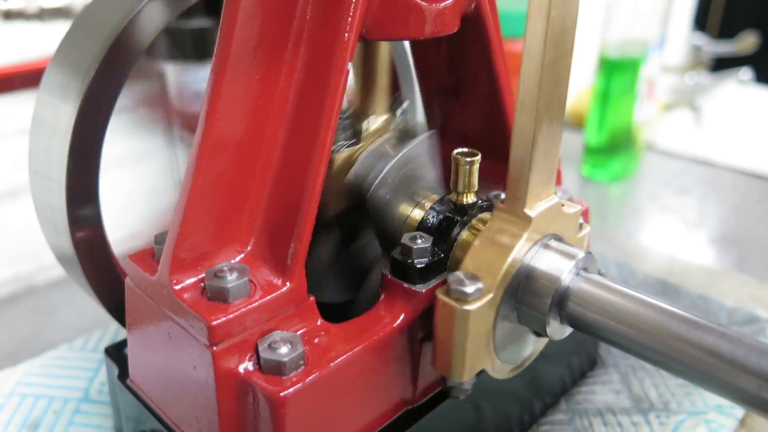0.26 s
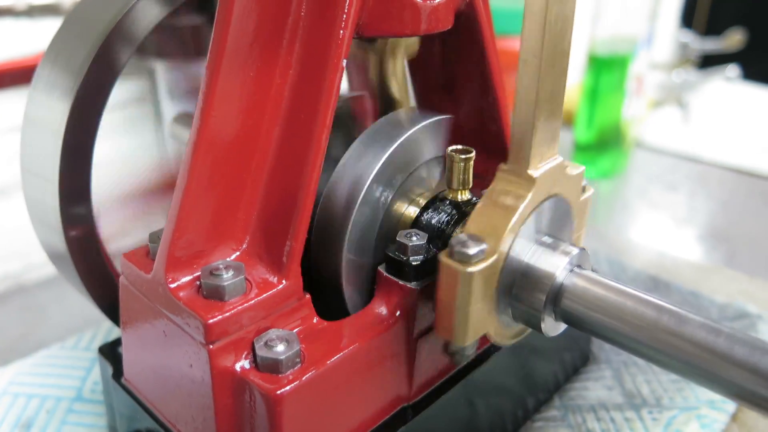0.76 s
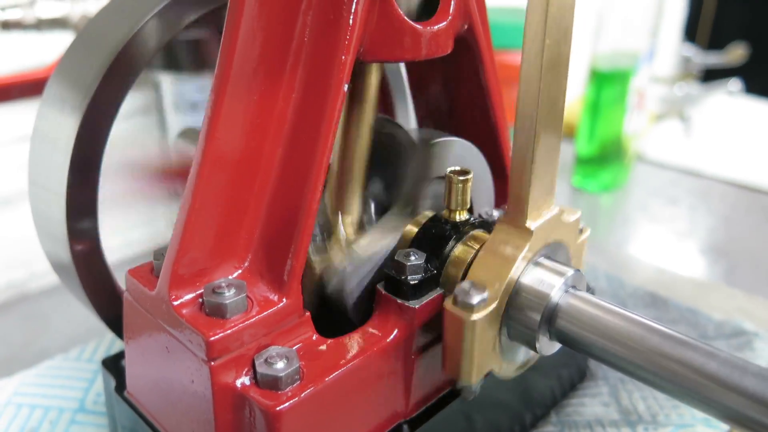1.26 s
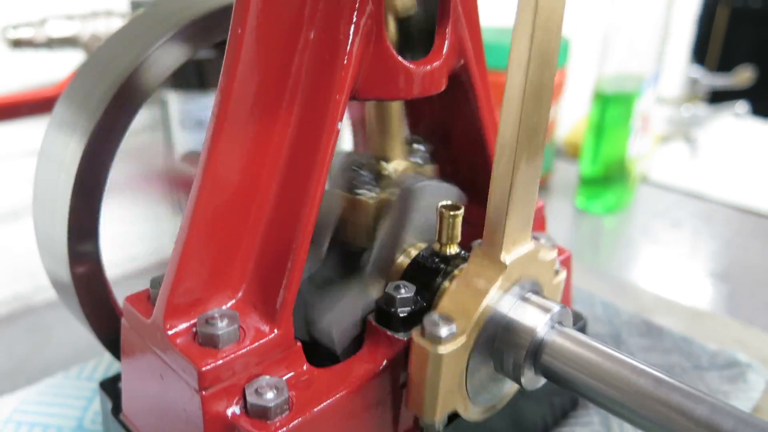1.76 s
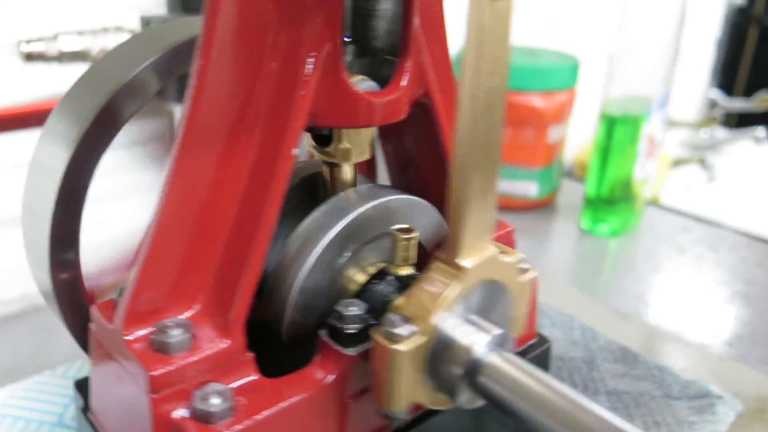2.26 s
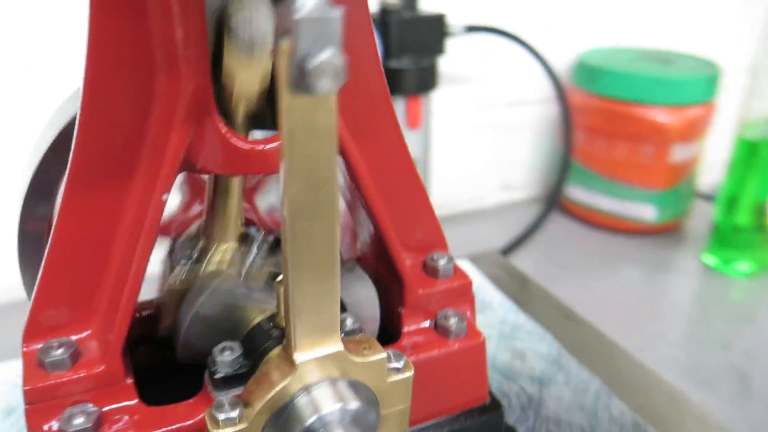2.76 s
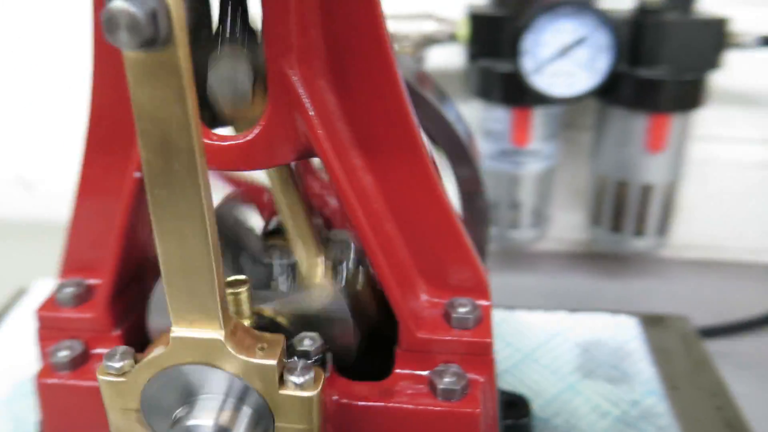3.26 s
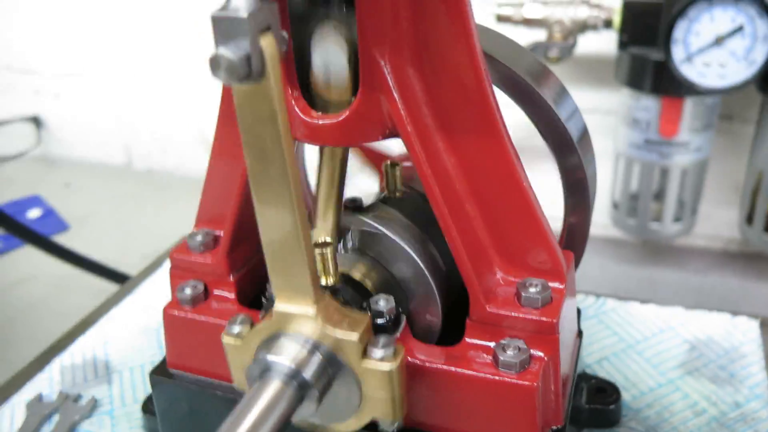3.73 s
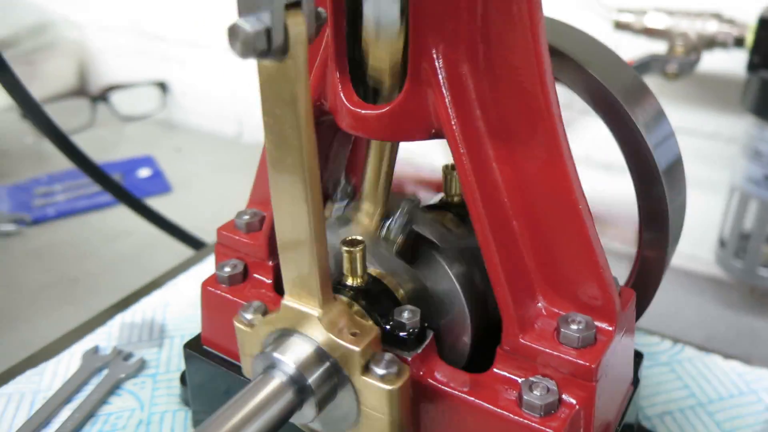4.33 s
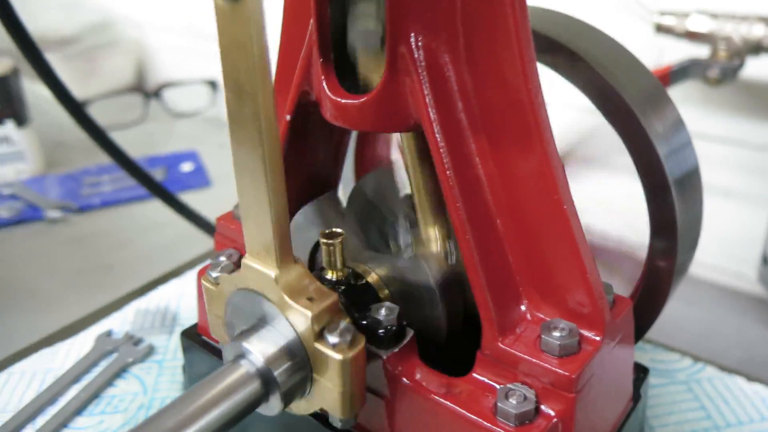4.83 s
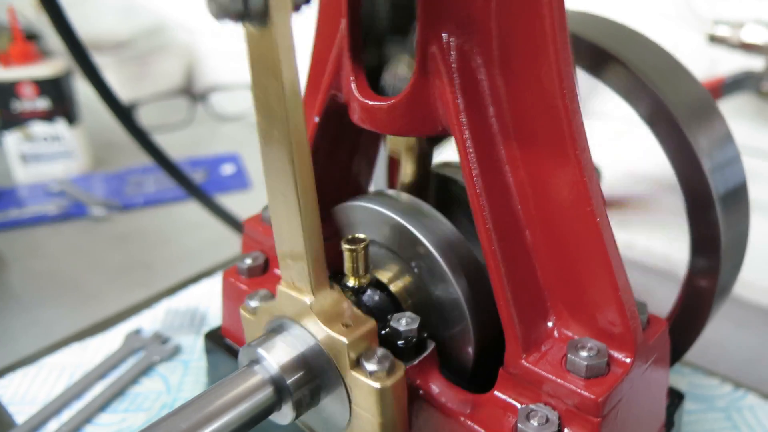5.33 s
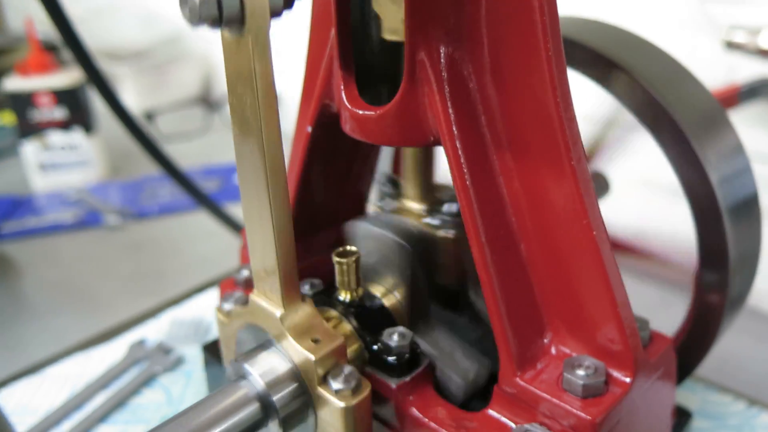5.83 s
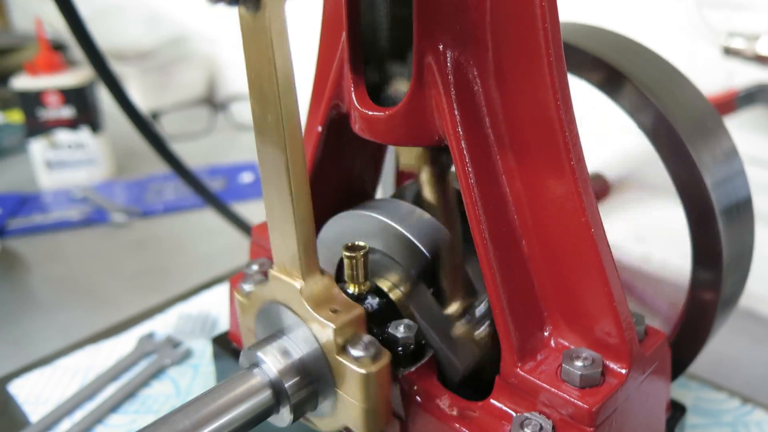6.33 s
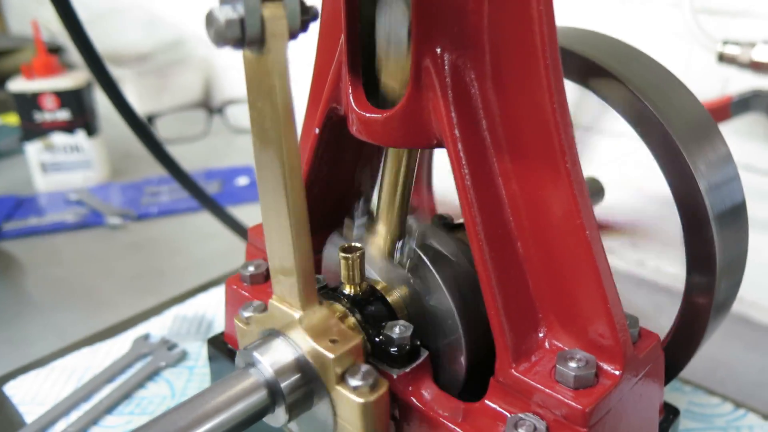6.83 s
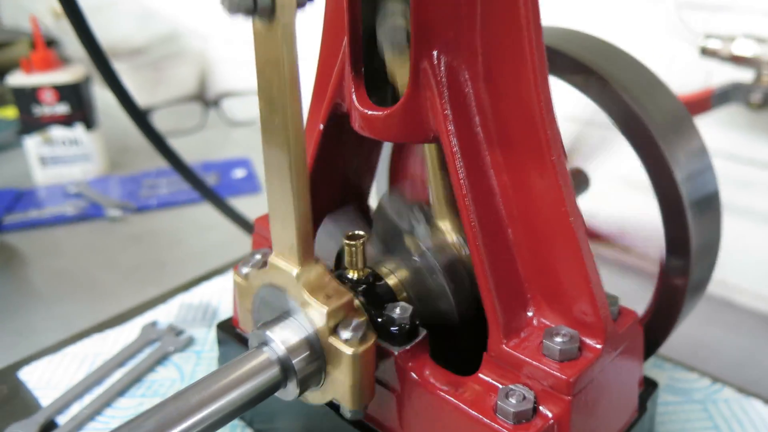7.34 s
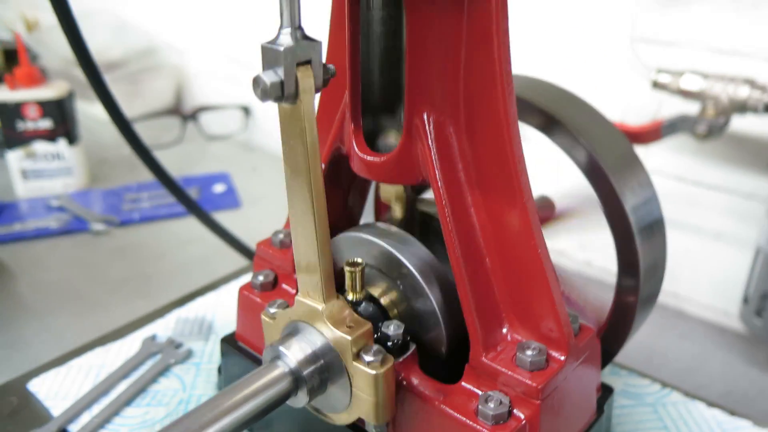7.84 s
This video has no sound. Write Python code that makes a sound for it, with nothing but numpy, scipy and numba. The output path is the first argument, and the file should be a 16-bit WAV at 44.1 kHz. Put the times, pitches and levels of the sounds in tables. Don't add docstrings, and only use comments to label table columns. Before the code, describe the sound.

Close stereo sound of a small model engine driven by compressed air, about three turns a second. Two sharp puffs per turn alternate with breathy, whistling inlet hiss, low soft thumps, bearing knocks and dry valve ticks. The microphones move round it; after three seconds puffs get louder and brighter. Behind, faint hammering on wood, a distant vehicle and low room rumble.

```python
import sys
import numpy as np
from scipy import signal
from scipy.fft import rfft, irfft, next_fast_len
from scipy.io import wavfile
from numba import njit

SR = 44100
rng = np.random.default_rng(int(sys.argv[2]) if len(sys.argv) > 2 else 0)


def invert_db(x):
    u = np.asarray(x, float) / 20
    return 10 ** u


def dump(signal):
    limited = np.clip(np.atleast_2d(signal).T, -1, 1)
    pcm = np.round(limited * 32767).astype(np.int16)
    wavfile.write(sys.argv[1], SR, pcm)


N = 356971

# frequency in Hz, level in dB.
RUMBLE_SPECTRUM = [(13, -43), (22, 7.5), (190, 0), (1090, -19), (2340, -17.5), (3630, -21), (13900, -26),
                   (14800, -36)]
# time in seconds, firing pitch in Hz, level in dB.
VEHICLE_PASSES = [
    [(1.84, 89, -50), (1.9, 90.4, -29), (2.3, 98.5, -46), (2.5, 102.5, -32), (2.9, 108.7, -42.5),
     (3.17, 113.6, -35), (3.45, 120, -46)],
    [(4.4, 58, -46), (4.7, 64, -40), (5.8, 86, -35.5), (6.4, 94, -43), (7, 96, -72), (7.8, 95, -35.5),
     (8.1, 95, -43)],
]
# time in seconds, peak level in dB.
HAMMER_BLOWS = [(0.14, -33.5), (0.469, -30), (0.737, -28), (0.974, -29), (1.319, -28.5), (1.618, -27),
                (1.921, -29), (2.199, -28.5), (2.469, -28), (2.745, -27)]
# frequency in Hz, width in Hz, level in dB.
PLANK_MODES = [(165, 52, 3.5), (360, 180, -7.5), (567.4, 14.4, 1.5), (734, 38, -2.9), (913, 18, -4),
               (965, 180, -19), (1330, 120, -16.5)]
# frequency in Hz, width in Hz, level in dB.
LEAK_MODES = [(4480, 400, -10), (6100, 200, -11), (9890, 140, 0.1), (10750, 130, -4), (11200, 130, -3),
              (12700, 600, -10), (13900, 170, 0.1)]
# frequency in Hz, width in Hz, level in dB.
FRAME_MODES = [(246, 370, -15), (398, 103, -1), (533, 33.7, 3.2), (635, 52, -6)]
# frequency in Hz, width in Hz, level in dB.
CHEST_MODES = [(2764, 78, 10.5), (2594, 67, 10)]
# frequency in Hz, width in Hz, level in dB.
PASSAGE_MODES = [(5016, 52, 7), (6880, 53, 5), (7800, 82, -21.5)]
# frequency in Hz, width in Hz, level in dB.
EDGE_MODES = [(9170, 110, 4.5), (9800, 190, -2), (11100, 180, -5), (11900, 59, 1), (11900, 220, -31),
              (13600, 400, -19)]
# mid-fill frequency in Hz, slide in Hz per second, width in Hz, level in dB.
RISING_CYLINDER_NOTES = [(4350, -3000, 130, -6), (5800, 9000, 110, -10)]
# mid-fill frequency in Hz, slide in Hz per second, width in Hz, level in dB.
FALLING_CYLINDER_NOTES = [(4300, -800, 120, -8), (5500, 7000, 100, -10)]
# frequency in Hz, width in Hz, level in dB.
JET_MODES = [(8980, 210, -3.5), (11270, 520, 2.5), (12800, 640, -0.5), (14500, 3900, -9.5)]
# frequency in Hz, width in Hz, level in dB.
PUFF_BODY_MODES = [(1180, 120, -9), (2640, 250, 3), (3430, 1100, -26), (4520, 380, -1), (5040, 270, -0.5),
                   (6980, 360, 2)]
# rising-stroke exhaust in seconds, its puff level in dB,
# big-end knock level in dB, valve tick level in dB.
ENGINE_TURNS = [(0.046, -21.5, -43, -16), (0.3563, -22.5, -39, -43.7), (0.6676, -26, -38, -39.6),
                (0.9757, -22.5, -39, -40), (1.2858, -22.5, -42, -38.4), (1.5983, -20.5, -39, -17.5),
                (1.9076, -23, -40, -43.5), (2.217, -21, -53, -23), (2.5261, -18.5, -46, -39.5),
                (2.837, -19.5, -36, -31), (3.146, -14, -37, -20), (3.4584, -14, -32, -18),
                (3.769, -12, -38, -35.7), (4.0805, -11.5, -40, -41), (4.3915, -12.5, -29.5, -19),
                (4.703, -11.5, -38, -39), (5.0173, -13.5, -32.5, -32), (5.3287, -12.5, -27, -18),
                (5.6388, -13, -30.5, -18), (5.9521, -11.5, -28, -29), (6.2587, -13, -41, -52),
                (6.5716, -13, -28, -37.4), (6.884, -12.5, -32.5, -35.8), (7.1947, -12.5, -29, -15.5),
                (7.507, -12.5, -35.5, -39.3), (7.8186, -14, -36, -10.5), (8.131, -18.5, -34, -40)]
# time in seconds, nearness in dB, left minus right in dB,
# facing the valve chest from 0 to 1.
MIC_WALK = [(0, 3.3, -0.5, 0.04), (.8, 1.6, -0.3, 0.63), (1.8, 2.5, 0, 0.4), (2.3, 1.5, -2, 0.27),
            (2.75, 0.5, -1.8, 1), (3.3, 5, -1.3, 1), (4, 6.5, -1, 0.2), (4.9, 8, -2, 0.48),
            (5.5, 7.5, -2.2, 0.4), (6.1, 9.5, -2.5, 0.13), (7.2, 8, -2.5, 0.22), (8.1, 6.5, -1, 0.17)]
# frequency in Hz, phase in radians.
LEFT_PHASE = [(100, -.05), (1400, -.3), (2700, -.6), (4000, -.55), (5500, -1.05), (7500, -2.3),
              (11000, -2.45), (15000, -2.9)]
# frequency in Hz, width in Hz, depth from 0 to 1.
HOUSING_DIPS = [(2080, 200, .35), (3600, 220, .88), (6400, 500, .8), (7750, 500, .75), (10300, 250, .7)]


def in_time(rows):
    s, *columns = np.transpose(rows)
    return [np.interp(np.arange(N) / SR, s, c) for c in columns]


def rms_one(x):
    return x / np.sqrt(np.mean(x ** 2) + 1e-20)


def through(x, response):
    size = next_fast_len(N + SR // 4)
    hz = np.arange(size // 2 + 1) * SR / size + 1e-3
    return irfft(rfft(x, size) * response(hz), size)[..., :N]


def on_log(points):
    table_hz, values = np.transpose(points)
    return lambda hz: np.interp(np.log(hz), np.log(table_hz), values)


def modes(rows, base_db):
    def response(hz):
        total = invert_db(base_db)
        for k, (f, width, db) in enumerate(rows):
            total = total + (-1) ** k * invert_db(db) / (1 + 1j * (hz - f * f / hz) / width)
        return total
    return response


def flutter(hz, depth_db):
    wander = through(rng.standard_normal(N), lambda f: 1 / (1 + (f / hz) ** 2))
    return invert_db(depth_db * rms_one(wander))


def strike(times_s, levels_db, shape, lead_s=0.):
    train = np.zeros(N + SR)
    at = np.round((np.asarray(times_s) - lead_s) * SR + SR // 2).astype(int)
    np.add.at(train, at, invert_db(levels_db))
    return signal.fftconvolve(train, shape)[SR // 2:SR // 2 + N]


def swell(rise_s, fall_s):
    t = np.arange(-.15, .15, 1 / SR)
    return np.exp(-.5 * (np.abs(t) / np.where(t < 0, rise_s, fall_s)) ** 2.36)


@njit
def sweep(x, hz, r, sr):
    y = np.zeros_like(x)
    for c in range(x.shape[0]):
        for n in range(2, x.shape[1]):
            drive = (1 - r * r) / 2 * (x[c, n] - x[c, n - 2])
            ring = 2 * r * np.cos(2 * np.pi * hz[n] / sr) * y[c, n - 1] - r * r * y[c, n - 2]
            y[c, n] = drive + ring
    return y


def slide(air, hz, width_hz, level_db):
    hz, r = np.clip(hz, 300, 9000), np.exp(-1.55 * np.pi * width_hz / SR)
    return invert_db(level_db - 1.5) * sweep(sweep(air, hz, r, SR), hz, r, SR)


def follow(base, slope, control):
    return base + slope * control


def strokes():
    s, puff_db, big_end_db, tick_db = np.transpose(ENGINE_TURNS)
    falling_s = s + .1632
    walk_s, near_db = np.transpose(MIC_WALK)[:2]
    near, later = np.interp(s, walk_s, near_db), np.interp(falling_s, walk_s, near_db)
    up = dict(s=s, puff_db=puff_db, hiss_db=follow(-35, 0.88, near),
              thump_db=follow(-26, 0.52, near), knock_db=follow(-39, 0.2, near))
    down = dict(s=falling_s, puff_db=follow(-28.5, 0.85, puff_db + 15), hiss_db=follow(-37, .9, later),
                thump_db=follow(-29, 0.59, later), knock_db=big_end_db, tick_db=tick_db)
    return up, down


def by_gland():
    pass_s, span_s = 3.59, 0.27
    return np.exp(-((np.arange(N) / SR - pass_s) / span_s) ** 2)


def chest_level_db():
    return follow(-9, 8.5, in_time(MIC_WALK)[2])


def hiss_top(hz):
    return 1 / np.sqrt(1 + (hz / 14250) ** 40)


def shop():
    common, apart = rng.standard_normal((2, N))
    gain_db = on_log(RUMBLE_SPECTRUM)
    mid = through(common, lambda hz: invert_db(gain_db(hz)))
    side = through(apart, lambda hz: invert_db(gain_db(hz)) / np.sqrt(1 + (300 / hz) ** 4))
    return invert_db(-36.0) * flutter(3.8, depth_db=.4) * rms_one(mid + side * [[.9], [-.9]])


def vehicle():
    out = np.zeros(N)
    for rows in VEHICLE_PASSES:
        (first_s, first_hz, _), (last_s, last_hz, _) = rows[0], rows[-1]
        fade_in, fade_out = (first_s - .1, first_hz, -90), (last_s + .1, last_hz, -90)
        hz, db = in_time([fade_in] + list(rows) + [fade_out])
        turns = np.cumsum(hz) / SR
        out += invert_db(db + 2.0) * (np.sin(2 * np.pi * turns) + 0.048 * np.sin(np.pi * turns))
    return out


def hammering():
    s, db = np.transpose(HAMMER_BLOWS)
    t = np.arange(0, .3, 1 / SR)
    decay = 0.85 * np.exp(-t / 0.012) + 0.59 * np.exp(-t / 0.056)
    echo = strike(s, db, np.minimum(t / 0.00047, 1) * decay)
    common, left, right = rng.standard_normal((3, N))
    noise = common + 0.45 * np.array([left, right])
    return invert_db(17.5) * through(echo * noise, modes(PLANK_MODES, base_db=-40))


def gland_leak():
    leak_db = follow(-43.5, 9.5, by_gland())
    response = modes(LEAK_MODES, base_db=-12.5)
    jet = through(rng.standard_normal((3, N)), lambda hz: response(hz) * hiss_top(hz))
    return invert_db(leak_db) * rms_one(jet)


def seat_clicks():
    up, down = strokes()
    times_s = np.r_[up["s"], down["s"]]
    levels_db = rng.normal(0, 0.89, len(times_s)) + np.repeat([-21.5, -20.5], len(ENGINE_TURNS))
    click = np.exp(-np.arange(0, .01, 1 / SR) / 0.0034)
    hits = strike(times_s + 0.004, levels_db, click) * rng.standard_normal(N)
    return through(hits, modes([(1520, 1400, -2.5), (3700, 320, 4)], base_db=-32))


def valve_tick():
    down, t = strokes()[1], np.arange(0, .03, 1 / SR)
    snap = np.exp(-t / 0.00067) + 0.17 * np.exp(-t / 0.0082)
    tick = strike(down["s"] - .0102, down["tick_db"] - 1, snap) * rng.standard_normal(N)
    return through(tick, lambda hz: 1 / (1 + 4500 / (1j * hz)) ** 2)


def knocks():
    up, down = strokes()
    push = -np.exp(-((np.arange(0, .01, 1 / SR) - .0012) / 0.00056) ** 2)
    blows = strike(down["s"] - .013, down["knock_db"] + 1.7, push)
    blows += strike(up["s"] - .0585, up["knock_db"] - 1.5, -push)
    chatter = rng.standard_normal(N) * flutter(90, depth_db=2.5)
    loose = strike(down["s"] - .047, down["hiss_db"] - 3, swell(0.014, 0.0065), 0.1524)
    loose += strike(up["s"] - .05, up["knock_db"] - 3, swell(0.0077, 0.053), 0.148)
    return through(invert_db(20) * blows + invert_db(17.0) * loose * chatter, modes(FRAME_MODES, base_db=-18))


def thump():
    t = np.arange(-.009, .12, 1 / SR)
    hz = 66 + 84 / (1 + np.exp(-(t - .0082) / .0028))
    turns = np.cumsum(hz) / SR - .34
    size = np.minimum((t + .009) / .004, 1) * (.55 + .6 * np.exp(-((t - .0095) / .0035) ** 2))
    decay = np.exp(-np.maximum(t - .01, 0) / 0.019)
    bounce = -size * decay * np.cos(2 * np.pi * turns)
    up, down = strokes()
    s, db = np.r_[up["s"], down["s"]], np.r_[up["thump_db"], down["thump_db"]]
    wall = strike(s + 0.0483, db - 10.0, bounce, 0.0086)
    return strike(s, db + 5.0, bounce, 0.00882) + wall


def since_fill(exhaust_s, lead_s):
    t = np.arange(N) / SR
    following = np.minimum(np.searchsorted(exhaust_s, t), len(exhaust_s) - 1)
    return t + lead_s - exhaust_s[following]


def inlet_hiss():
    up, down = strokes()
    near = in_time(MIC_WALK)[0]
    port_hz, port_db = follow(1366, 20.5, near), follow(-2.06, -0.21, near)
    passage_db, edge_db = follow(-6.5, 0.46, near), follow(-10, 4.9, by_gland())
    noise = rng.standard_normal((3, N)) * flutter(64, depth_db=2.0) * flutter(3.5, depth_db=0.84)
    rising = noise * strike(up["s"] - .05, up["hiss_db"], swell(0.025, 0.038), 0.14)
    falling = noise * strike(down["s"] - .075, down["hiss_db"], swell(0.016, 0.031) ** 0.97, .15)
    late = noise * strike(down["s"] - .05, down["hiss_db"], swell(0.039, 0.05), 0.16)
    since_up, since_down = since_fill(up["s"], lead_s=0.063), since_fill(down["s"], lead_s=0.092)
    out = slide(rising, port_hz - 40 + 600 * since_up, width_hz=376, level_db=port_db)
    out += slide(late, port_hz + 30 + 2200 * since_down, width_hz=150, level_db=port_db + 1.5)
    for hz, rate, width_hz, db in RISING_CYLINDER_NOTES:
        out += slide(rising, hz + rate * since_up, width_hz, passage_db + db + 9.0)
    for hz, rate, width_hz, db in FALLING_CYLINDER_NOTES:
        out += slide(falling, hz + rate * since_down, width_hz, passage_db + db + 9.0)
    air = rising + falling
    out += invert_db(chest_level_db()) * through(air, modes(CHEST_MODES, base_db=-19.0))
    out += invert_db(passage_db) * through(air, modes(PASSAGE_MODES, base_db=-12))
    out += invert_db(edge_db) * through(air, modes(EDGE_MODES, base_db=-15.0))
    return invert_db(13.5) * through(out, hiss_top)


def exhaust_puff():
    t = np.arange(0, .08, 1 / SR) - .008
    opening = np.exp(t / 0.0042) * np.minimum((t + 0.019) / 0.0041, 1)
    sigh = 1.06 * np.exp(-t / 0.0051) + 0.34 * np.exp(-t / 0.0094)
    spit = np.exp(-(t / 0.00094) ** 2)
    burst = 0.78 * np.where(t < 0, opening, sigh) + 0.17 * spit
    (up, down), noise = strokes(), rng.standard_normal((3, N))
    s = np.r_[up["s"], down["s"]]
    jet = noise * strike(s, np.r_[up["puff_db"], down["puff_db"]], burst, 0.0098)
    jet = through(jet * flutter(510, depth_db=1.5), modes(JET_MODES, base_db=-24.0))
    blow_db = np.r_[up["hiss_db"] + 15.5 + .2 * up["puff_db"], down["hiss_db"] + 1.5]
    blow = strike(s - .0015, blow_db, burst, 0.00816) * flutter(380, depth_db=1.4)
    body = through(noise * blow, modes(PUFF_BODY_MODES, base_db=-21.5))
    return invert_db(11.5) * (jet + body * invert_db(.5 * chest_level_db()))


def scene():
    near, pan_db, _ = in_time(MIC_WALK)
    share = np.clip(follow(0.45, 0.027, near), 0, 1)
    air = inlet_hiss() + exhaust_puff() + gland_leak()
    right = np.sqrt(share) * air[0] + knocks() + seat_clicks()
    phase = on_log(LEFT_PHASE)
    left = through(right, lambda hz: np.exp(1j * phase(hz)) * (1 - 0.3 / (1 + (7000 / hz) ** 4)))
    scattered = through(air[1:], lambda hz: 0.25 + 0.5 / (1 + (3500 / hz) ** 2))
    engine = np.array([left, right]) + np.sqrt(1 - share) * scattered
    engine = engine * invert_db(pan_db * [[.5], [-.5]])
    return engine + valve_tick() + thump() + vehicle() + hammering() + shop()


def low_pass(x):
    return signal.sosfilt(signal.butter(12, 16350, fs=SR, output="sos"), x)


def record(dry):
    def housing(hz):
        return np.prod([1 - depth / (1 + 1j * (hz - f * f / hz) / width)
                        for f, width, depth in HOUSING_DIPS], axis=0)
    left, right = through(dry, housing)
    side = through((left - right) / 2, lambda hz: 1 + 0.018 / (1 + (6000 / hz) ** 4))
    wide = (left + right) / 2 + side * [[1], [-1]]
    wide = signal.sosfilt(signal.cheby2(14, 70, 16250, fs=SR, output="sos"), wide)
    return low_pass(np.clip(wide, -1, 1))


dry = scene()
out = record(dry)
dump(out)
```